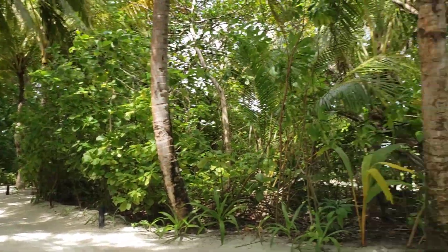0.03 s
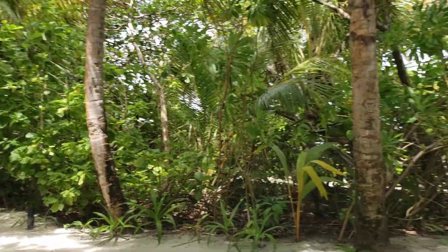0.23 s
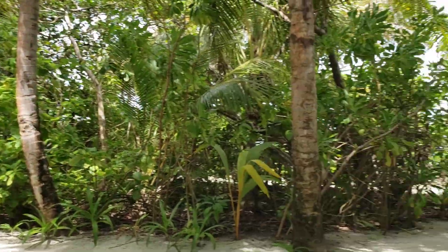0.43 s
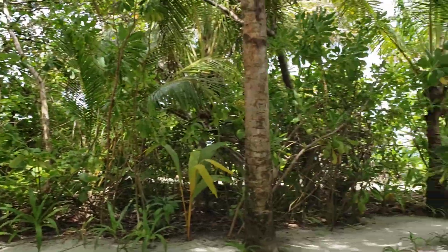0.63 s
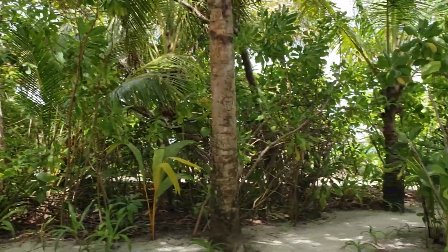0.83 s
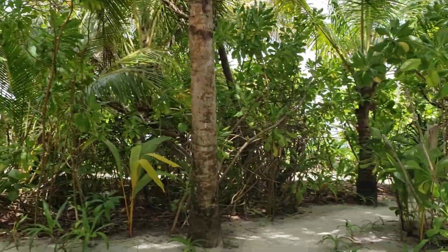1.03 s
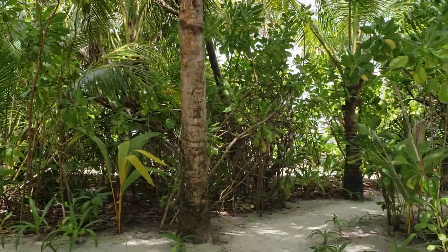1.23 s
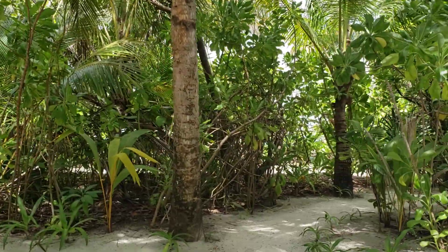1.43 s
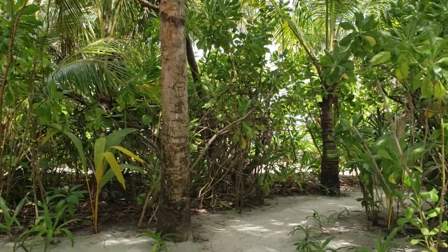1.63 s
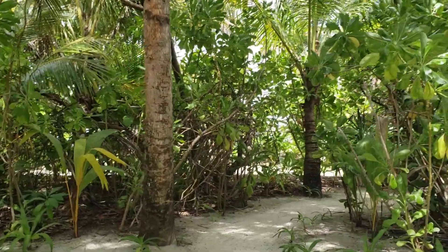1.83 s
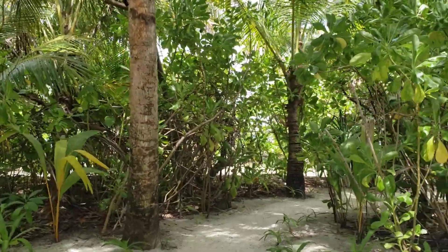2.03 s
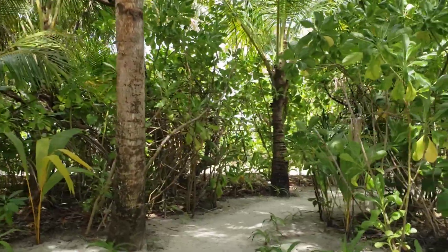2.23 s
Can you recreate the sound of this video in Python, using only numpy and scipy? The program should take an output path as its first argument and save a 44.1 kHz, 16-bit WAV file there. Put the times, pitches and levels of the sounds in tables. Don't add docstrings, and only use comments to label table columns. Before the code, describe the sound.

Low wind rumble thumps against the microphone, hardest early on, with faint leaf rustle and hiss behind

```python
import sys
import numpy as np
from scipy import signal
from scipy.fft import rfft, irfft
from scipy.io import wavfile
from scipy.ndimage import uniform_filter1d

SR = 44100
rng = np.random.default_rng(int(sys.argv[2]) if len(sys.argv) > 2 else 0)


def master_out(mix):
    frames = np.transpose(np.atleast_2d(mix))
    ceiling = np.clip(frames, -1, 1)
    pcm = np.round(ceiling * 32767).astype(np.int16)
    wavfile.write(sys.argv[1], SR, pcm)


def level_to_linear(level):
    exponent = np.asarray(level, float) / 20
    return 10 ** exponent


N = 101429


def rms_one(x):
    return x / np.sqrt(np.mean(x ** 2, axis=-1, keepdims=True) + 1e-20)


def coloured(points, channels=2):
    hz = np.maximum(np.arange(N // 2 + 1) * SR / N, 1)
    point_hz, point_db = np.transpose(points)
    shape = level_to_linear(np.interp(np.log(hz), np.log(point_hz), point_db))
    shape = shape * np.minimum(hz / point_hz[0], 1) ** 2
    noise = rng.standard_normal((channels, N))
    return rms_one(irfft(rfft(noise) * shape, N))


def drift(rate):
    hop = 40
    r = np.exp(-2 * hop * np.pi * rate / SR)
    slow = signal.lfilter([1], [1, -2 * r, r * r], rng.standard_normal(N // hop + 2002))
    slow = slow[2000:]
    return np.interp(np.arange(N) / hop, np.arange(len(slow)), rms_one(slow - slow.mean()))


def evened(x):
    evenness = 0.29
    power = uniform_filter1d(x ** 2, size=1500, axis=-1)
    return rms_one(x / (power + .05) ** (evenness / 2))


def recorder_hiss():
    # pitch in Hz, strength in dB per Hz.
    hiss_colour = [(300, -15.5), (1500, 1.5), (6300, -2), (8300, -7), (10500, -5), (12000, -0.5),
                   (14000, -3.5), (15700, -2.5)]
    return level_to_linear(-50.5) * coloured(hiss_colour)


def whir():
    # pitch in Hz, strength in dB per Hz.
    left_colour = [(400, 2.5), (1500, -0.5), (3800, 0.5), (6000, -3), (7200, -1.5), (8500, -18.5),
                   (11000, -17), (15800, -12)]
    right_colour = [(400, -5.5), (3500, -6), (7200, -5), (8500, -13.5), (10500, -1), (11900, 2.5),
                    (13200, 0), (15700, 1.4)]
    stop_s, fade_s, flutter_db = 2.05, 0.0053, 1.21
    port_db = np.array([[-50], [-48.5]])
    since_stop = np.arange(N) / SR - stop_s
    on = 1 / (1 + np.exp(np.clip(since_stop / fade_s * 2, -50, 50)))
    pair = np.vstack([coloured(left_colour, channels=1), coloured(right_colour, channels=1)])
    return pair * on * level_to_linear(port_db + flutter_db * drift(13.0))


def leaves():
    # pitch in Hz, strength in dB per Hz.
    leaf_colour = [(60, -14), (150, -6), (300, -2.5), (500, -5.5), (800, -8.5), (1300, -15), (2500, -39.5),
                   (6000, -27)]
    loudness_db, sway_db, pan_db = -51, 2.14, -0.1
    alike = 0.89
    lag = 15
    shared, left, right = coloured(leaf_colour, channels=3)
    common = np.array([shared, np.roll(shared, lag)])
    scattered = np.array([left, right])
    pair = np.sqrt(alike) * common + np.sqrt(1 - alike) * scattered
    sway = 0.13 * drift(4.5) + 0.77 * drift(14.0)
    balance = level_to_linear(pan_db * np.array([[1], [-1]]))
    return pair * level_to_linear(loudness_db + sway_db * sway) * balance


def eddies(rows):
    length = 0.76
    out = np.zeros(N)
    phases = rng.uniform(0, 2 * np.pi, (len(rows), 2))
    for (s, db, hz), (phase, other) in zip(rows, phases):
        i = np.arange(max(int((s - .05) * SR), 0), min(int((s + .05) * SR), N))
        turn = (i / SR - s) * hz
        angle = 2 * np.pi * turn
        swing = np.exp(-(turn / length) ** 2) * np.cos(angle + phase)
        edge = level_to_linear(-10 + 0.18 * (db + 22)) * np.exp(-(turn * 2 / length) ** 2)
        edge = edge * np.cos(2.06 * angle + phase + .15 * (other - np.pi))
        snap = level_to_linear(-42.5 + 1.55 * (db + 25.5)) * np.exp(-(turn * 4.7 / length) ** 2)
        snap = snap * np.cos(3.24 * angle + phase)
        out[i] += level_to_linear(db) * (swing + edge + snap)
    return out


def port_wind():
    # time in seconds, left level in dB, right level in dB.
    gust_levels = [(0, -32.5, -37), (.18, -43, -40), (.26, -28, -38), (.36, -32, -33), (.40, -36, -35),
                   (.55, -37, -35), (.63, -24, -36), (.7, -27, -42), (.78, -28.5, -32.5), (.83, -37, -36),
                   (1.12, -38, -35.5), (1.25, -32.5, -35), (1.4, -37, -38.5), (1.9, -35, -35),
                   (1.95, -28.5, -44), (2.04, -43, -41), (2.18, -49, -54), (2.23, -41.5, -44)]
    # pitch in Hz, strength in dB per Hz.
    low_colour = [(20, -40), (40, -1), (60, 5), (100, -6.5), (150, -5.5), (220, -21), (350, -24.5),
                  (600, -77)]
    bright_colour = [(50, -27), (100, -19), (160, -6.5), (250, -1), (400, -15.5), (700, -35), (1200, -92)]
    # time in seconds, peak in dB, pitch in Hz.
    left_eddies = [(.217, -22.5, 97), (.24, -22.5, 120), (.259, -16.5, 84), (.299, -14.5, 103),
                   (.318, -19.5, 119), (.353, -18.5, 68), (.381, -35, 70.5), (.432, -21.5, 86),
                   (.457, -17.5, 90.4), (.502, -16, 92), (.924, -31, 84), (1.014, -26, 106),
                   (1.032, -26, 103), (1.171, -30, 95), (1.197, -23, 94), (1.262, -23.5, 116),
                   (1.281, -26, 124), (1.315, -23, 101), (1.345, -24.5, 69), (1.425, -26, 91.5),
                   (1.503, -28, 92), (1.624, -26.5, 83), (1.686, -33, 84), (1.715, -31.5, 97),
                   (1.814, -23.5, 115), (1.835, -22, 69), (2.1, -34.5, 91), (2.21, -28, 101),
                   (2.28, -37, 91)]
    right_eddies = [(0.284, -25, 82), (0.306, -24, 84), (0.336, -25, 81), (0.442, -25, 72),
                    (0.491, -28, 73), (0.535, -26, 91), (0.566, -26, 108), (0.616, -22, 101),
                    (0.644, -23, 78), (0.733, -26, 73), (0.809, -24, 76), (0.88, -26, 117),
                    (0.946, -25, 84), (1.006, -23, 79), (1.031, -23, 100), (1.059, -24, 74),
                    (1.136, -25, 82), (1.166, -24, 72), (1.182, -24, 73), (1.222, -28, 97),
                    (1.337, -25, 123), (1.457, -25, 86), (1.526, -25, 68), (1.567, -22, 89),
                    (1.599, -28, 65), (1.666, -25, 81), (1.688, -27, 91), (1.763, -27, 78),
                    (1.806, -29, 93), (1.843, -27, 89)]
    buffets = [(.595, -42, 108), (0.627, -15, 87), (.645, -6.5, 126), (.669, -12.5, 142),
               (0.684, -14.5, 125), (.713, -18.5, 71), (.734, -17, 146), (0.751, -11.5, 99),
               (0.764, -12.5, 69), (0.787, -13, 82), (1.931, -20.5, 124), (1.943, -16.5, 139),
               (1.958, -19, 138), (1.976, -20, 110), (1.993, -22, 76.5), (2.012, -23, 99)]
    lumps_db, right_trim_db = 2, -1.5
    s, *sides = np.transpose(gust_levels)
    t = np.arange(N) / SR
    gust = np.array([np.interp(t, s, db) + lumps_db * drift(10.7) for db in sides])
    low = level_to_linear(gust) * evened(coloured(low_colour))
    bright_db = -14.5 + gust + 0.67 * (gust + 32.5)
    bright = level_to_linear(bright_db) * evened(coloured(bright_colour))
    left = eddies([*left_eddies, *buffets])
    right = level_to_linear(right_trim_db) * eddies(right_eddies)
    return low + bright + np.array([left, right])


def scene():
    # time in seconds, gain in dB.
    gain_steps = [
        (0, 4.5),
        (.1, 3.5),
        (.4, 3.5),
        (.45, 3.5),
        (.63, 3),
        (.65, 1.5),
        (.72, 0.5),
        (1.6, 0.5),
        (2.0, 0.3),
        (2.3, 0.4),
    ]
    s, db = np.transpose(gain_steps)
    gain = level_to_linear(np.interp(np.arange(N) / SR, s, db))
    steady = recorder_hiss() + whir() + leaves()
    return gain * steady + port_wind()


def band_limit(x):
    return signal.sosfilt(signal.butter(12, 15890, fs=SR, output="sos"), x)


def record(dry):
    low_cut = signal.butter(2, 30.0, "high", fs=SR, output="sos")
    top_cut = signal.ellip(14, .3, 70, 15745, fs=SR, output="sos")
    mix = signal.sosfilt(top_cut, signal.sosfilt(low_cut, dry))
    return band_limit(mix)


dry = scene()
out = record(dry)
master_out(out)
```